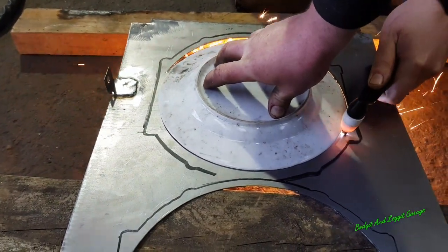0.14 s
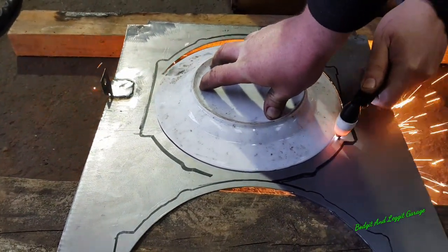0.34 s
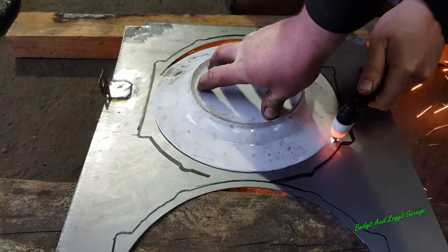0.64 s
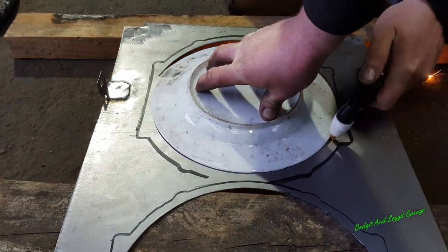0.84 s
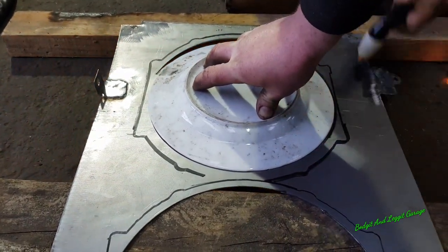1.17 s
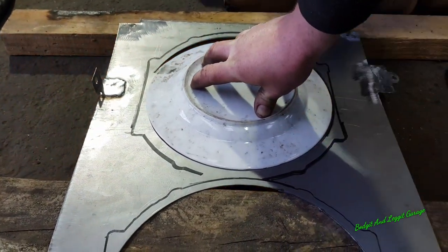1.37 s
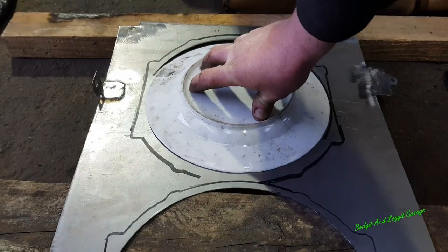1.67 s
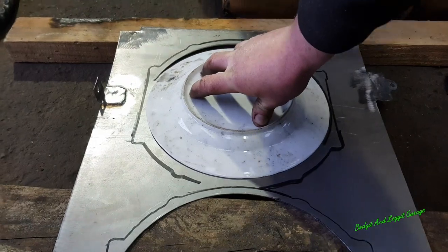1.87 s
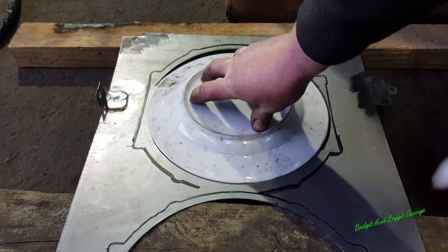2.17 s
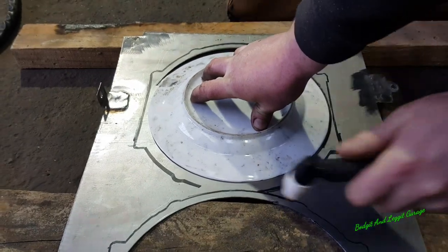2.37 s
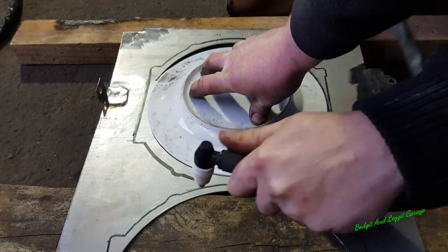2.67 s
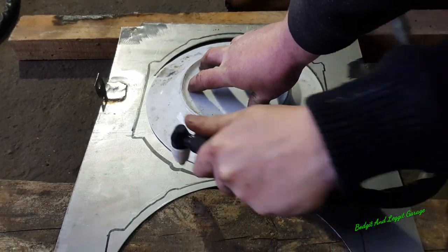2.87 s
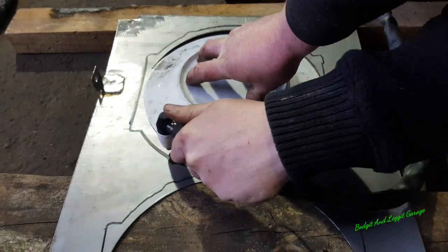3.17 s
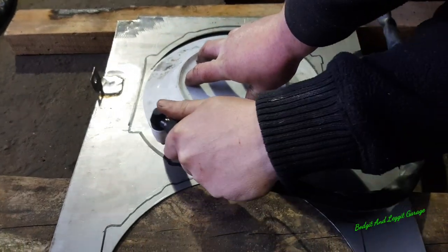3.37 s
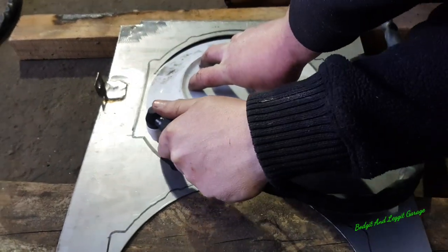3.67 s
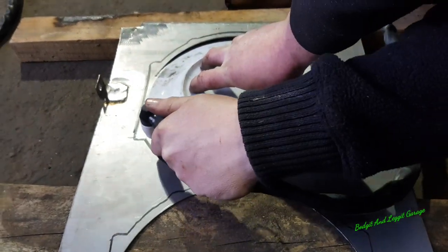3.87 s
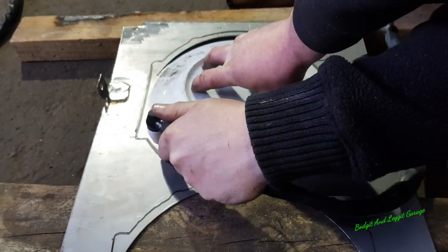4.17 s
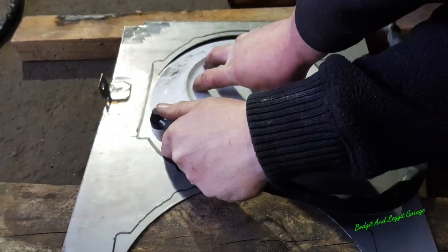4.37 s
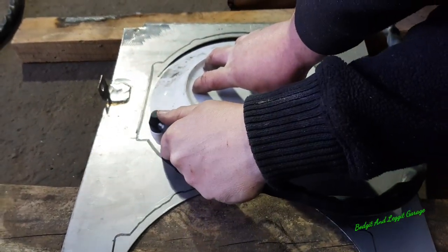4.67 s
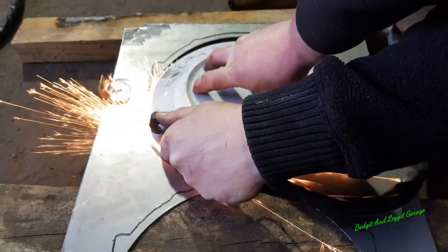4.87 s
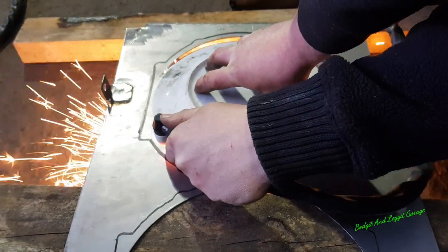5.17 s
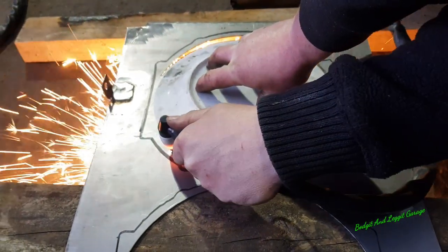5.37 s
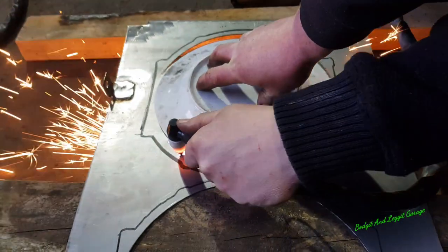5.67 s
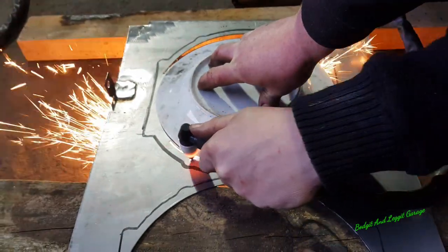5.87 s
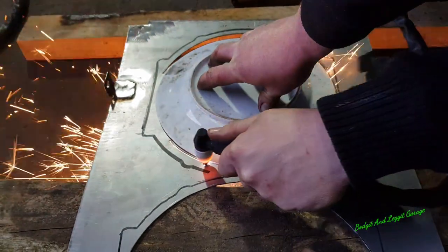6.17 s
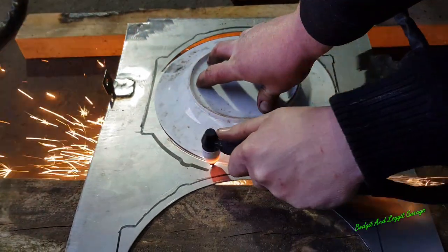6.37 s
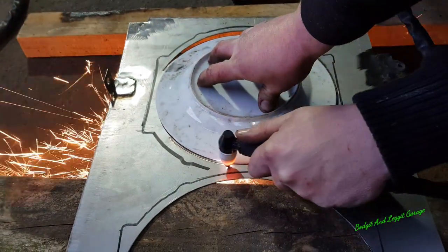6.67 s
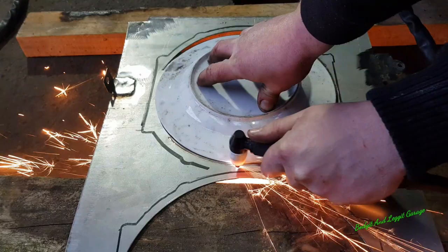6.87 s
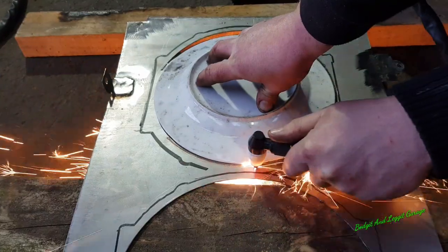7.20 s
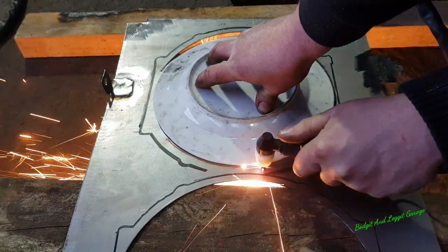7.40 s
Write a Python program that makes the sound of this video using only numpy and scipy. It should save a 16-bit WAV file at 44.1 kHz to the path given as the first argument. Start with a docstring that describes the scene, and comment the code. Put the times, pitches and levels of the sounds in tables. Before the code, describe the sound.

A rough, hissing metal cut ends abruptly in a snap and pop. The torch's air jet blows on, fading and surging as it moves past edges and openings, with breathy tones and a brief thin whistle. It is held near the plate, rushing steadily over power-unit hum and faint workshop rumble. The arc strikes with a crack and stuttering squeal, then tears noisily through steel with dense sparks, heard in close stereo.

```python
"""A hand plasma torch cuts sheet steel: turbulent noise roars in ringing hollows, random impulses crackle as sparks.
The arc goes out with a snap and a pop; the power unit's hum, a set of unsteady sines, swells while it is out.
The air jet, coloured noise, hisses on; lifted and swept, it whooshes, whistles and blows hollow tones over the work.
Set down again, the torch relights: a crack, a squeal of short sine spurts and a breathy tail.
The second cut goes on, roaring and spitting sparks over hum and workshop rumble."""
import sys
import numpy as np
from scipy import signal
from scipy.fft import rfft, irfft, next_fast_len
from scipy.io import wavfile
from scipy.ndimage import uniform_filter1d, minimum_filter1d, map_coordinates

SR = 44100
rng = np.random.default_rng(int(sys.argv[2]) if len(sys.argv) > 2 else 0)


def master_out(mix):
    """Clip the mix to full scale and print it as 16-bit PCM to the path in sys.argv[1]."""
    frames = np.transpose(np.atleast_2d(mix))
    ceiling = np.clip(frames, -1, 1)
    pcm = np.round(ceiling * 32767).astype(np.int16)
    wavfile.write(sys.argv[1], SR, pcm)


N = 332514
ARC_OFF_S, ARC_ON_S = .7884, 4.991
FIRST_CUT_DB = -41  # even turbulence of the first cut, before roar_db

# roar in the cut: f/Hz, relative density/dB
TURBULENCE_SPECTRUM = [(100, -5), (250, 5), (350, 4), (600, 4.5), (1000, 9), (1350, -7), (1600, -22),
                       (2150, 13), (3000, -16), (9000, -49)]
# low resonances, template dish and hollow under the sheet: f/Hz, width/Hz, relative level/dB
BODY_MODES = [(463, 144, -1), (780, 210, -2.5)]
# brighter resonances at their edges: f/Hz, width/Hz, relative level/dB
EDGE_MODES = [(1390, 870, 3.5), (1790, 370, -6), (2160, 780, -5), (2840, 400, -19)]
# fresh cut behind the torch: f/Hz, width/Hz, relative level/dB
KERF_MODES = [(1920, 160, 4), (2250, 140, 4), (3000, 200, 3), (4230, 350, -3), (5700, 260, 4),
              (6050, 240, -10), (7360, 260, -14)]


def roar(roar_db=0.5, body_db=-4, edges_db=-5, kerf_db=-4, lumps_db=1.53, brighten_db_per_db=0.29):
    """While the arc burns, gas and melt tear through the cut in quick lumps and stir the hollow below."""
    gain = burning() * amp(cutting_db() + roar_db)
    bright_db = brighten_db_per_db * (cutting_db() - FIRST_CUT_DB)  # a harder roar rings the edges more
    body = amp(body_db) * ringing(BODY_MODES)
    edges = amp(edges_db + bright_db) * ringing(EDGE_MODES)
    air = noise(TURBULENCE_SPECTRUM) + body + edges
    kerf = amp(kerf_db) * ringing(KERF_MODES)
    return gain * (amp(lumps_db * wobble(110)) * air + kerf)


# turbulence along the second cut: t/s, level/dB before roar_db
SECOND_CUT = [(5.05, -36.5), (5.78, -32.5), (6.03, -44.5), (6.19, -41), (6.33, -34), (6.8, -31.5),
              (7.1, -33.5), (7.3, -29), (7.45, -26), (7.54, -24.5)]


def cutting_db():
    """Strength of the turbulence: even in the first cut, changing along the second."""
    first = np.arange(N) / SR < (ARC_OFF_S + ARC_ON_S) / 2
    return np.where(first, FIRST_CUT_DB, curves(SECOND_CUT)[0])


def burning(edge_s=0.013):
    """1 while the arc burns, 0 while it is out."""
    return 1 - gate(ARC_OFF_S, ARC_ON_S, edge_s)


# jet striking steel, also crackle and crack: f/Hz, relative density/dB
RUSH_SPECTRUM = [(700, -21), (1100, -11.5), (1400, -3.5), (1650, -4), (2200, -6), (3800, -3), (5000, -1.5),
                 (6200, -1.5), (6750, -2), (7300, -2), (7800, -7.5), (10000, -6), (15000, -114)]


def sparks(spark_db=-30, follow_db_per_db=0.092, bursts_per_s=1700, scatter_db=1.6):
    """Droplets of molten steel burst in a dense fine crackle, stronger when the cut roars."""
    level_db = spark_db + follow_db_per_db * (cutting_db() - FIRST_CUT_DB)
    hits = rng.random((2, N)) < bursts_per_s / SR  # rate of each of the two mixed trains
    bursts = hits * rng.standard_normal((2, N)) * amp(scatter_db * wobble(60))
    return burning() * amp(level_db) * spread(bursts, lambda hz: amp(along(RUSH_SPECTRUM, hz)))


# free hiss at the nozzle: t/s, level/dB before hiss_db
JET_LEVEL = [(0.0, -26.5), (0.53, -26.5), (1.29, -30.5), (1.36, -36), (1.58, -35.5), (1.6, -33.5),
             (1.61, -35), (1.97, -37.5), (1.99, -35), (2.22, -31), (3.1, -34), (3.2, -34.5), (3.27, -33),
             (4.73, -34.5), (4.92, -28.5), (4.99, -32), (5.77, -34.5), (7.54, -29.5)]
# free hiss: f/Hz, relative density/dB
HISS_SPECTRUM = [(25, -28), (120, 2.5), (500, -1), (1000, -1.5), (1500, -4), (3000, 1.5), (4500, -3),
                 (6150, 2.5), (6750, 1), (7300, 4.5), (7800, -3), (9000, -3.5), (10500, 3.5), (12800, 7),
                 (15600, 1.5)]
# free hiss: f/Hz, left-right likeness
JET_LIKENESS = [(100, 0.97), (1000, 0.67), (2000, 0.68), (3200, 0.28), (4700, 0.84), (6800, 0.095),
                (8700, 0.41), (13000, 0.06)]


def jet(hiss_db=8.5, flutter_db=0.9):
    """Compressed air hisses from the nozzle, arc or no arc."""
    level_db, = curves(JET_LEVEL)
    return amp(level_db + hiss_db + flutter_db * wobble(25)) * noise(HISS_SPECTRUM, JET_LIKENESS)


# echoes from sheet, template and bench: mean delay/ms, gain
BENCH_ECHOES = [(.9, 0.041), (1.55, 0.11), (2.7, 0.13), (4.3, 0.21), (6.9, 0.34)]


def bench(x, sway=0.0371):
    """Close echoes comb the hiss; their paths shift as the hand moves."""
    return x + sum(gain * delayed(x, ms * (1 + sway * wobble(0.687))) for ms, gain in BENCH_ECHOES)


# jet striking the steel: t/s, level/dB before rush_db and lift
IMPACT_LEVEL = [(0.0, -25.5), (0.69, -24), (1.0, -26.5), (1.28, -29.5), (1.4, -36.5), (2.16, -41),
                (2.22, -33), (2.58, -28), (2.63, -26), (2.72, -31.5), (3.1, -29.5), (3.6, -27.5),
                (4.95, -24), (5.1, -26.5), (5.15, -28.5), (5.67, -28), (7.12, -29.5), (7.54, -24.5)]
# seat of the torch: t/s, L-R/dB, slot ring/dB, rim ring/dB, rim pitch ratio
TORCH_SEAT = [(0, -1.5, -1.5, -10, 1), (0.95, -1, -4.5, -6, 1.01), (1.08, 1, 7, -1, 0.95),
              (1.32, -2, 4, 7, 0.93), (1.6, 1, -16, 0, 1.01), (2.2, -4.5, -31, -8, 0.97),
              (2.65, 3.5, -3, -4, .96), (3.05, 3.5, -10, -4, 0.97), (3.3, 3.5, -11, 0.5, .995),
              (4.9, 2, -6, -1.5, 0.97), (5.5, 4, -31, -5, 1.012), (6.5, 2.5, -28, -3.5, 1),
              (7.54, 3.5, -14, -5, 1.05)]
# slot left by the first cut: f/Hz, width/Hz, relative level/dB
SLOT_MODES = [(1244, 96, 6.5), (1488, 98, 6), (1864, 76, 0.5), (2130, 260, 0), (2426, 210, 9),
              (2980, 810, 4), (3230, 170, 3), (3560, 130, 4.5), (4780, 120, 5), (4970, 250, 3.5),
              (5640, 290, 2), (6280, 150, 6)]
# gap between torch and template rim: f/Hz before pitch ratio, width/Hz before it, relative level/dB
RIM_MODES = [(604, 110, -2.5), (1860, 100, 1), (2043, 86, -1), (2212, 140, 3), (2413, 79, 2),
             (2795, 73, 1.5), (2968, 78, 3.5), (3500, 117, 3), (3875, 320, 2), (4400, 350, -0.5),
             (4730, 280, -8), (5350, 150, -1.5)]


def impact(rush_db=4.0, flutter_db=.5, seated_db=-29, lift_db_per_db=0.4):
    """Near the sheet the jet rushes louder; seated on it, it rings the cut slot or the gap at the template's rim."""
    level_db, = curves(IMPACT_LEVEL)
    # the rush fades faster once the torch is off the steel
    level_db = level_db + lift_db_per_db * np.minimum(level_db - seated_db, 0)
    pan_db, slot_db, rim_db, rim_pitch = curves(TORCH_SEAT)
    slot = amp(slot_db) * ringing(SLOT_MODES)
    rim = amp(rim_db) * retuned(ringing(RIM_MODES), rim_pitch)
    air = noise(RUSH_SPECTRUM) + slot + rim
    air = air / np.sqrt(1 + amp(slot_db) ** 2 + amp(rim_db) ** 2)
    port_db = np.array([pan_db, -pan_db]) / 2
    return air * amp(level_db + rush_db + flutter_db * wobble(60) + port_db)


# air held in the template dish, rung from above: f/Hz, width/Hz, relative level/dB
DISH_MODES = [(451, 146, 1), (842, 310, 0), (1280, 100, 0), (1420, 140, -5.5), (1690, 130, -6),
              (2230, 130, -6), (2580, 150, -14), (3100, 160, -16)]


def sweep(body_db=-8, dish_db=0, edges_db=-5, lumps_db=1.25):
    """The lifted jet whooshes as it crosses edges, brighter where it hits them squarely, higher as the gap narrows."""
    body, edges, pitch = crossings()
    low = amp(body_db) * ringing(BODY_MODES) + amp(dish_db) * ringing(DISH_MODES)
    bright = amp(edges_db) * retuned(ringing(EDGE_MODES), pitch)
    return amp(lumps_db * wobble(110)) * (body * low + edges * bright)


# bare jet crosses an edge of the work: t/s, relative level/dB, rise/s, fall/s, brightness/dB, edge pitch ratio
EDGE_CROSSINGS = [(.88, -42.5, 0.039, 0.1, 1, 0.9), (1.27, -35, 0.041, 0.06, 8.5, 0.9),
                  (1.405, -31.5, 0.019, 0.034, 0.5, 0.99), (1.529, -40.5, 0.048, 0.026, 8.5, 1.02),
                  (1.81, -35.5, 0.022, 0.045, -6, 0.88), (2.006, -39, 0.015, 0.012, 2.5, 0.87),
                  (2.25, -25.5, .013, 0.011, 5, 1.03), (2.51, -23.5, 0.025, 0.034, -4, 1.02),
                  (2.565, -24.5, .04, 0.11, -10, 1), (2.583, -28, 0.03, 0.024, 13.5, 1),
                  (2.632, -32.5, 0.02, .028, 15, 1.7), (3.0, -37, 0.0296, 0.041, -1, 1),
                  (4.93, -36.5, 0.77, .035, 5, 1.12)]


def crossings():
    """Each whoosh swells and dies about a rounded top: gain of the body, gain and gliding pitch of the edges."""
    t = np.arange(N) / SR
    body, power, pitch = 0, 1e-20, 0
    for s, db, rise_s, fall_s, bright_db, ratio in EDGE_CROSSINGS:
        away = (t - s) / np.where(t < s, rise_s, fall_s)
        gain = amp(db) * np.exp(1 - np.hypot(1, away))
        bright = (gain * amp(bright_db)) ** 2
        body = np.hypot(body, gain)
        power = power + bright
        pitch = pitch + ratio * bright  # mean weighted by power
    return body, np.sqrt(power), pitch / power


# torch lingers over a gap: start/s, end/s, final level/dB, swell/dB, first f/Hz, last f/Hz
HOLLOW_BLOWS = [(0, .8, -42.5, -13, 1338, 1290), (1.017, 1.3, -30.5, 7.5, 1250, 1232),
                (1.392, 1.57, -43, 2, 940, 1140), (3.055, 5.031, -28.5, 7, 1226, 1240)]


def hollow(cut_db=-5.5, cut_follow_db_per_db=1.44, whoosh_db=-9, edge_s=0.041, half_width_hz=40,
           alike=0.86, flutter_db=0.4):
    """The main hollow resonance, a breathy tone near 1.2 kHz, shifts with the torch; cut and whooshes stir it too."""
    t = np.arange(N) / SR
    stirred_db = FIRST_CUT_DB + cut_db + cut_follow_db_per_db * (cutting_db() - FIRST_CUT_DB)
    gain = np.hypot(burning() * amp(stirred_db), amp(whoosh_db) * crossings()[1])
    pitch_points = []
    for start, end, db, swell_db, first_hz, last_hz in HOLLOW_BLOWS:
        blow_db = np.interp(t, [start, end], [db - swell_db, db])
        gain = np.hypot(gain, gate(start, end, edge_s) * amp(blow_db))
        pitch_points += [(start, first_hz), (end, last_hz)]
    hz, = curves(pitch_points)
    white = rng.standard_normal((2, 3, N))
    # slow random swings of the tone
    real, imag = filtered(white, lambda f: 1 / (1 + (f / half_width_hz) ** 2))
    common, left, right = real * np.cos(cycles(hz)) + imag * np.sin(cycles(hz))
    tone = np.sqrt(alike) * common + np.sqrt(1 - alike) * np.array([left, right])
    return gain * unit(amp(flutter_db * wobble(30)) * tone)


# hollow overblown, then a thin high whistle: start/s, end/s, level/dB, f/Hz, width/Hz
BREATHY_WHISTLES = [(1.036, 1.18, -34, 1790, 240), (1.195, 1.29, -29, 1836, 260),
                    (2.313, 2.418, -30, 6330, 522)]


def whistle(edge_s=0.018):
    """Brief breathy whistles: the hollow overblown near 1.8 kHz, then a thin high one at 6.3 kHz."""
    total = 0
    for start, end, db, hz, width_hz in BREATHY_WHISTLES:
        total = total + amp(db) * gate(start, end, edge_s) * ringing([(hz, width_hz, 0)])
    return total


def arc_out(pop_db=-8, width_s=0.00088, snap_db=-6.5, snap_s=0.00028, lead_s=0.0012, room_db=-13):
    """The arc snaps off, then the hot gas collapses in a dull pop."""
    t = np.arange(N) / SR - ARC_OFF_S

    def push(u):
        return (1 - 2 * u ** 2) * np.exp(-u ** 2)

    snap = amp(snap_db) * push((t + lead_s) / snap_s)
    pop = amp(pop_db) * push(t / width_s) + snap
    return pop + amp(room_db) * room(pop)


# spurts of the striking arc: t/s, length/s, level/dB, overtones/dB, first f/Hz, last f/Hz (before jitter)
SQUEAL_SPURTS = [(4.9924, 0.015, -8.5, -16, 2200, 2075), (5.0085, 0.0052, -9, -9, 2170, 2100),
                 (5.017, 0.011, -8.5, -7, 2150, 1860), (5.032, 0.0062, -15.5, 0, 2000, 1930),
                 (5.059, 0.004, -16, -13, 1990, 1930), (5.075, .004, -25, -14, 2100, 2060),
                 (5.082, .006, -25, -12, 2090, 2050)]
# nozzle above its squeal: f/Hz, width/Hz, relative level/dB
NOZZLE_MODES = [(4030, 120, 4), (4490, 290, -6), (6300, 390, -10)]


def arc_strike(jitter=0.0124, edge_s=.0011, crack_db=-12, crack_t60_s=0.013, room_db=-14,
               fray_db=-24, fray_t60_s=0.45, fray_hz=2070, fray_width_hz=330):
    """The arc catches with a crack; the nozzle squeals in sagging spurts, turns harsh and frays into a breathy tail."""
    t = np.arange(N) / SR
    waver = 1 + jitter * wobble(500)
    tone, harsh = 0, 0
    for s, length_s, db, overtones_db, first_hz, last_hz in SQUEAL_SPURTS:
        gain = amp(db) * gate(s, s + length_s, edge_s)
        hz = waver * np.interp(t, [s, s + length_s], [first_hz, last_hz])
        tone = tone + np.sqrt(2) * gain * np.sin(cycles(hz))
        harsh = harsh + gain * amp(overtones_db)

    def dying(db, t60_s):
        return (t > ARC_ON_S) * amp(db - 60 * np.abs(t - ARC_ON_S) / t60_s)

    crack = dying(crack_db, crack_t60_s) * noise(RUSH_SPECTRUM)
    fray = dying(fray_db, fray_t60_s) * ringing([(fray_hz, fray_width_hz, 0)])
    return tone + harsh * ringing(NOZZLE_MODES) + crack + fray + amp(room_db) * room(tone)


# decay of the workshop walls: f/Hz, t60/s
WALL_DECAY = [(200, 0.17), (2000, 0.29), (10000, 0.16)]


def room(x):
    """The workshop's answer to a mono sound: a noise tail dying at its own rate in each band."""
    hz, t, z = signal.stft(rng.standard_normal((2, SR // 2)), SR, nperseg=256)
    decay_db = -60 * t / along(WALL_DECAY, hz)[:, None]
    tail = signal.istft(z * amp(decay_db), SR, nperseg=256)[1]
    return signal.fftconvolve(x[None], tail / np.linalg.norm(tail[0]), axes=1)[:, :N]


# hum of the power unit: mean f/Hz, relative level/dB
HUM = [(72, -21.5), (97, -18), (123.8, 0), (126.7, -17.5), (128.7, -15), (145.3, -8), (169.5, -20.5),
       (193.8, -15), (266.5, -20), (290.7, -13.5), (298, -13.5), (364, -15)]
# workshop rumble: f/Hz, relative density/dB
RUMBLE_SPECTRUM = [(20, -32), (45, -13), (90, -8), (135, -1), (220, -20.5), (330, -4), (700, -14.5),
                   (1200, -64), (4000, -89)]


def power_unit(hum_db=-36.0, swell_db_per_s=1.5, waver_db=1.5, drift=0.00271, floor_db=-43):
    """Fan and motor lines, slightly unsteady, over the workshop's rumble; the hum swells while the arc is out."""
    idle_s = (1 - burning()) * (np.arange(N) / SR - ARC_OFF_S)
    lines = 0
    for hz, db in HUM:
        gain = amp(db + waver_db * wobble(8))
        lines = lines + gain * np.sin(cycles(hz * (1 + drift * wobble(4))))
    hum = amp(hum_db + swell_db_per_s * idle_s) * unit(lines)
    return hum + amp(floor_db) * noise(RUMBLE_SPECTRUM)


def amp(db):
    """Decibels to gain."""
    return 10 ** (np.asarray(db) / 20)


def unit(x):
    """x at rms 1."""
    return x / np.sqrt(np.mean(x ** 2) + 1e-20)


def along(points, hz):
    """(f/Hz, value) points read on a log axis."""
    f, v = np.transpose(points)
    return np.interp(np.log(hz + 1), np.log(f + 1), v)


def curves(rows):
    """One value per sample for each column after the time."""
    s, *cols = np.transpose(rows)
    return [np.interp(np.arange(N) / SR, s, c) for c in cols]


def wobble(knots_per_s):
    """A smooth random curve."""
    knots = rng.standard_normal(int(N * knots_per_s / SR) + 4)
    return map_coordinates(knots, [np.arange(N) * knots_per_s / SR])


def cycles(hz):
    """Running phase of a changing frequency, in radians."""
    return 2 * np.pi * np.cumsum(hz) / SR


def gate(start, end, edge_s):
    """Opens at start and closes at end, with soft edges."""
    t = np.arange(N) / SR
    return (np.tanh((t - start) / edge_s) - np.tanh((t - end) / edge_s)) / 2


def delayed(x, ms):
    """x later by a delay that may move."""
    return map_coordinates(x, [np.arange(N) - ms * SR / 1000], order=3)


def retuned(pair, pitch):
    """Stereo noise read at a moving speed, which shifts its resonances by the pitch ratio."""
    return np.array([map_coordinates(port, [np.cumsum(pitch) % (N - 1)]) for port in pair])


def filtered(x, response):
    """x times a response of frequency."""
    m = next_fast_len(N + SR // 2)
    return irfft(rfft(x, m) * response(np.fft.rfftfreq(m, 1 / SR)), m)[..., :N]


# general stereo noise: f/Hz, left-right likeness
LIKENESS = [(40, 0.24), (120, 1), (400, 0.95), (900, 0.84), (1350, 0.64), (1800, 0.13), (5000, 0.38),
            (14000, 0.1)]


def spread(pair, response, alike=LIKENESS):
    """Two unrelated signals, coloured and mixed to stereo of rms 1, as alike at each frequency as the table says."""
    def mid_side(hz):
        turn = np.arccos(np.clip(along(alike, hz), -1, 1)) / 2
        return response(hz) * np.array([np.cos(turn), np.sin(turn)])

    mid, side = filtered(pair, mid_side)
    return unit(np.array([mid + side, mid - side]))


def noise(spectrum, alike=LIKENESS):
    """Stereo noise of rms 1 with the given spectrum."""
    return spread(rng.standard_normal((2, N)), lambda hz: amp(along(spectrum, hz)), alike)


def ringing(modes):
    """Stereo noise of rms 1 in a few resonances."""
    def shape(f):
        power = 0
        for hz, width_hz, db in modes:
            power = power + amp(db) ** 2 / (1 + (2 * (f - hz) / width_hz) ** 2) ** 2
        return np.sqrt(power)

    return spread(rng.standard_normal((2, N)), shape)


# bearing of the torch: t/s, lag of the left port/ms
TORCH_BEARING = [(0, 0.26), (1.3, 0.23), (1.55, 0.13), (1.7, 0.024), (1.85, 0.14), (2.0, 0.28),
                 (2.15, 0.46), (2.3, 0.34), (2.45, 0.18), (2.6, 0.097), (2.85, 0.058), (3.3, -0.0015),
                 (5.3, -0.03), (6.0, 0.019), (7.54, 0.14)]


def scene():
    """The torch's sounds reach the two ports with a lag that follows the hand."""
    hiss = np.array([bench(port) for port in jet()])
    cut = roar() + sparks()
    swept = impact() + sweep() + hollow() + whistle()
    left, right = cut + hiss + swept + arc_out() + arc_strike()
    lag_ms, = curves(TORCH_BEARING)
    return np.array([delayed(left, lag_ms), right]) + power_unit()


# colour of the microphone ports: f/Hz, L-R/dB
PORT_COLOUR = [(100, -1), (350, -2.5), (700, 1), (1100, 2.5), (1450, 6.5), (1850, 3.5), (3200, 6),
               (4300, 1), (5300, -3), (7400, -15.5), (8900, 1.5), (10000, -5), (13000, -16.5), (15500, -15)]
# phase of the microphone ports: f/Hz, lead of the left port/rad
PORT_PHASE = [(100, 0.16), (600, 0.42), (1300, 0.81), (2000, 1.3), (2400, 1.2), (3000, 1), (4300, 0.54),
              (5500, -0.62), (6900, -0.65), (8000, 0.72), (9700, -0.71), (13000, -1), (14200, -0.45)]


def record(dry, ceiling=0.84, hold_s=0.015, top_hz=15700):
    """Each microphone port has its own colour and phase; a limiter ducks the peaks; a band limit cuts the top."""
    def ports(hz):
        colour_db, lead_rad = along(PORT_COLOUR, hz), along(PORT_PHASE, hz)
        gains = amp(np.array([colour_db, -colour_db]) / 2)
        lead = np.exp(1j * np.array([lead_rad, -lead_rad]) / 2)
        return lead * gains / np.sqrt(np.mean(gains ** 2, axis=0))

    x = filtered(dry, ports)
    needed = ceiling / np.maximum(np.abs(x).max(axis=0), ceiling)
    hold = max(int(hold_s * SR), 4)
    held = minimum_filter1d(needed, hold, origin=(hold - 1) // 2)
    gain = uniform_filter1d(held, size=64)
    return filtered(x * gain, lambda hz: hz < top_hz)


dry = scene()
out = record(dry)
master_out(out)
```